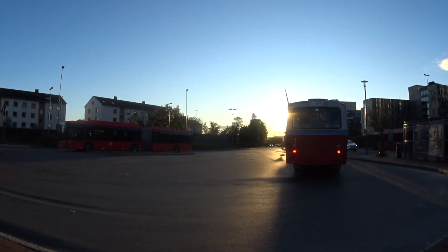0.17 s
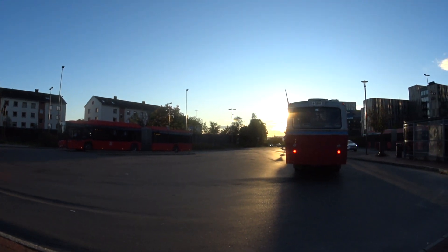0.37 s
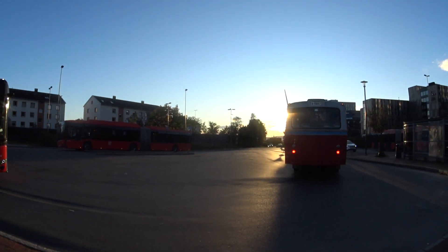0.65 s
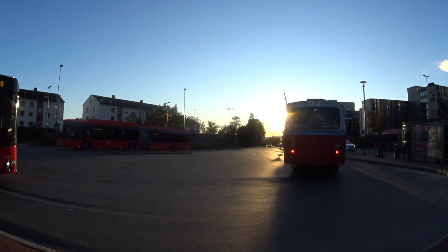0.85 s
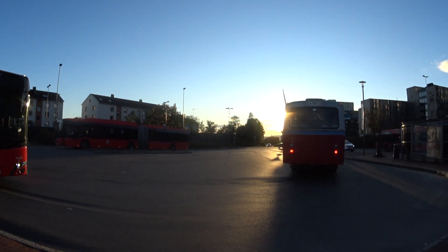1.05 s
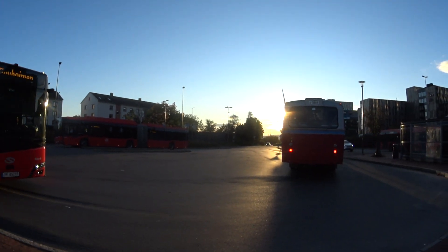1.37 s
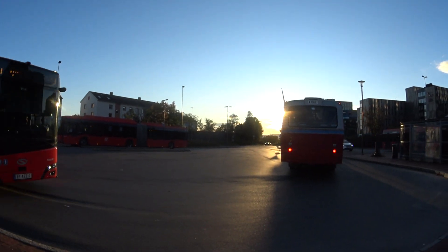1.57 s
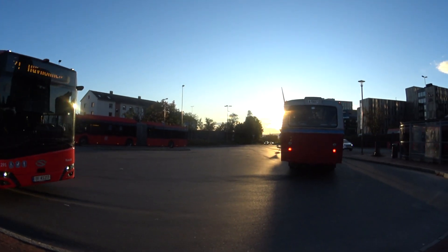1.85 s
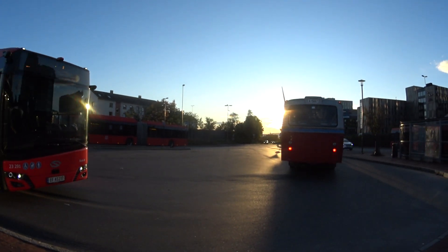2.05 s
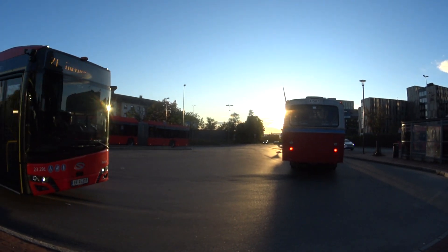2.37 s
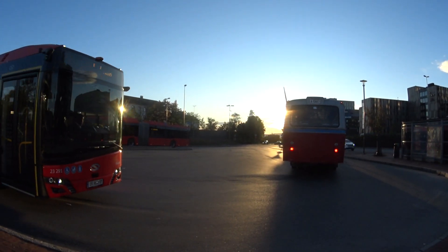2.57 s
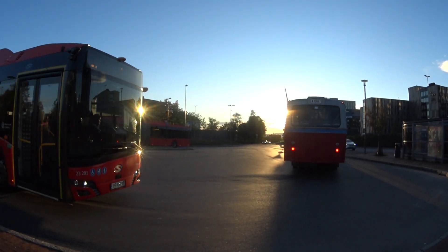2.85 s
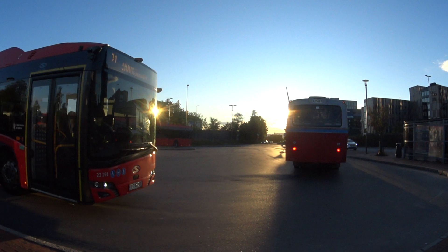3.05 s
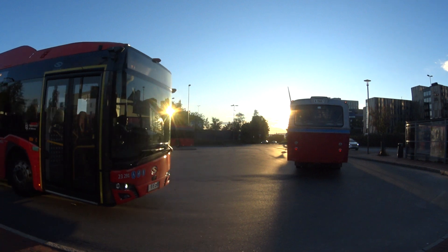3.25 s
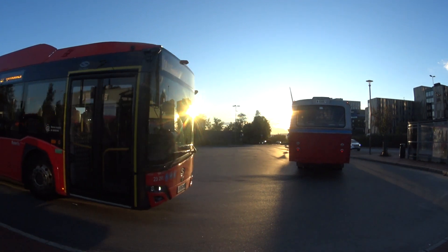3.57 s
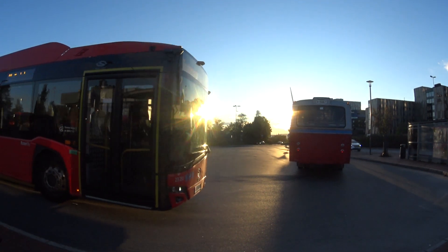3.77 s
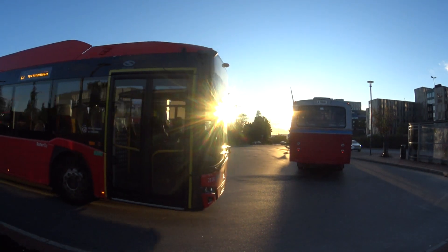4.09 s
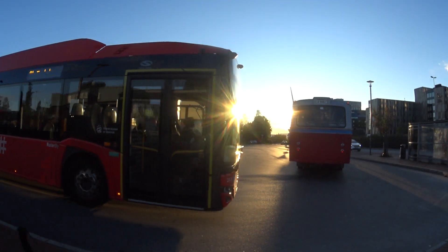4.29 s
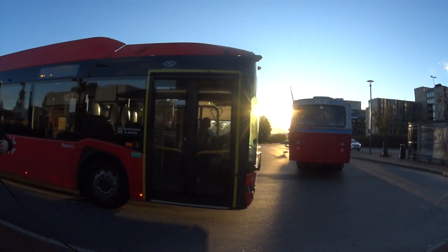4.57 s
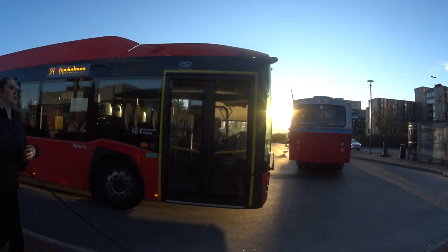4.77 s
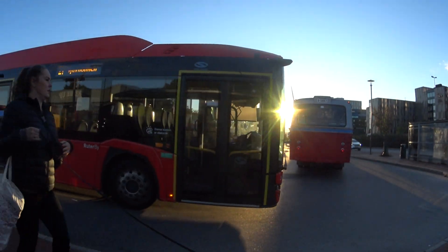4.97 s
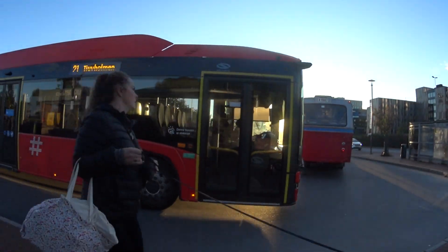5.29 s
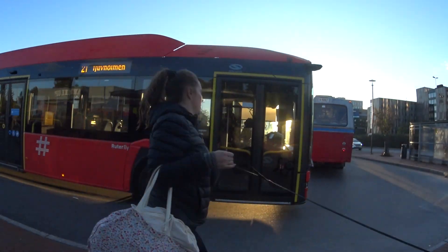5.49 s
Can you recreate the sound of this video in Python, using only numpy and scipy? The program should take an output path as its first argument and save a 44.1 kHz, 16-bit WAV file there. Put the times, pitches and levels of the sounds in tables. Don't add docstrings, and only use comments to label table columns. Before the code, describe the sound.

Outdoor bus terminal with a constant wash of engines and tyres and a faint fan whine. Half a second in, an air brake vents loudly, ending in a chirping puff and dull thud. A brief two-tone horn toot echoes off facades, with thin brake squeals around it. A lone air puff comes just past three seconds; later, faint brake singing and metal ticks. Small camera microphone, weak bass.

```python
import sys
import numpy as np
from scipy import signal
from scipy.fft import rfft, irfft, next_fast_len
from scipy.io import wavfile
from scipy.ndimage import uniform_filter1d, map_coordinates

SR = 44100
rng = np.random.default_rng(int(sys.argv[2]) if len(sys.argv) > 2 else 0)


def magnitude_from_level(level_db):
    exponent = np.asarray(level_db, float) / 20
    return 10 ** exponent


def int16_out(signal):
    q = np.round(np.clip(np.atleast_2d(signal).T, -1, 1) * 32767)
    wavfile.write(sys.argv[1], SR, q.astype(np.int16))


N = 248349

# frequency in Hz, level in dB per Hz.
JET_COLOUR = [(880, -34), (1500, -0.5), (2090, -2.5), (3040, 1), (3990, -3), (4300, 0.5), (4640, -2),
              (6790, -3), (10900, -12), (14200, -53), (22000, -120)]
# frequency in Hz, level in dB per Hz.
ROAR_COLOUR = [(71, -54), (120, -35), (166, -47), (226, -4.5), (264, -14), (300, -7.5), (608, -2.5),
               (955, -2.5), (1730, -11), (3500, -12.5), (4550, -34), (7700, -120)]
# opens in seconds, rise in seconds, shuts in seconds, peak in dB,
# fade in seconds for the first 10 dB.
JET_VENT = (0.552, .057, 1.11, -16.5, .045)
ROAR_VENT = (0.585, .036, 1.07, -20.5, .075)
# opens in seconds, rise in seconds, shuts in seconds, peak in dB,
# fade in seconds for the first 10 dB.
PUFFS = [
    (0.988, .016, 1.11, -20, .05),
    (3.131, .014, 3.21, -21.8, .15),
]
# frequency in Hz, level in dB per Hz.
PUFF_COLOUR = [(290, -30), (500, -9), (893, -22), (1080, -15), (1230, -8), (1350, -11.5), (1770, -5.5),
               (3000, 1.5), (3890, -4), (7700, -1.5), (10900, -9.5), (14200, -54), (22000, -120)]
# frequency in Hz, width in Hz, level in dB.
PIPE_RESONANCES = [(1375, 45, 13), (2980, 700, -0.5), (4100, 110, 3), (7350, 200, -8)]
# start in seconds, length in seconds, pitch in Hz,
# glide in Hz, level in dB.
EDGE_TONES = [
    (1.0, .06, 2900, 250, -33),
    (1.055, .042, 3030, -230, -22.5),
    (3.133, .05, 3000, 550, -31),
    (5.07, .1, 2900, 0, -53),
]
# time in seconds, peak in dB, pitch in Hz, time to fall 60 dB in seconds.
THUDS = [
    (1.037, -32.5, 126, 0.062),
]
# frequency in Hz, likeness (0 to 1).
AIR_ALIKE = [(60, 0.66), (300, 0.99), (1000, 0.75), (4000, 0.93), (11000, 1)]
HORN_HZ = 416.5, 515.9
LOW_HORN_DB = [-37, -30.5, -27, -34.5, -40, -26, -25, -33, -37, -39, -42, -43, -42, -51, -49, -55, -41, -52,
               -46, -51, -49, -51, -52]
HIGH_HORN_DB = [-29, -34.5, -18.5, -22.5, -27, -28, -35, -44, -52, -58, -61, -64, -59, -59, -60, -63, -55,
                -66]
# frequency in Hz, width in Hz, boost in dB.
FLARE = (992, 50, 6)
RELAY_S = 1.284, 1.472
# start in seconds, length in seconds, pitch in Hz, glide in Hz, level in dB.
SQUEALS = [(.45, .15, 8863, 0, -60), (1.24, .3, 10060, -70, -57), (1.5, .28, 9975, 170, -57),
           (1.76, .36, 10140, -70, -56), (2.1, .19, 10070, -170, -54), (1.56, .3, 8975, -50, -60),
           (1.86, .56, 8940, -70, -61), (1.75, .28, 9790, -35, -66), (1.58, .22, 4018, 4, -51),
           (1.81, .25, 4022, 4, -57), (2.04, .24, 4035, -45, -52), (2.28, .08, 3845, -35, -50),
           (2.06, .18, 5322, -8, -62), (2.205, .095, 5315, -14, -49), (3.71, .27, 8850, 40, -56),
           (3.97, .36, 8888, 12, -56), (4.72, .33, 5275, 0, -48), (5.04, .23, 5275, 0, -54),
           (4.83, .53, 6985, 0, -56), (5.26, .5, 5275, 0, -44), (4.76, .16, 9135, 0, -65),
           (5.4, .26, 9145, 0, -61), (.3, .3, 2140, 0, -53), (4.2, .72, 2620, 0, -55)]
# time in seconds, level in dB.
FAN_LEVEL = [(0, -43), (.2, -37), (.46, -43.5), (.6, -44), (1.8, -48), (2.3, -47), (2.7, -76), (3.3, -48),
             (3.6, -57), (4.1, -43), (4.5, -49.5), (4.85, -48.5), (5.05, -51), (5.4, -53), (5.63, -48)]
# time in seconds, peak in dB, ring in Hz.
TICKS = [
    (1.878, -55, 8400),
    (1.93, -55, 8300),
    (4.80, -48, 10650),
    (5.017, -36, 4300),
    (5.022, -52, 10600),
    (5.169, -39, 3600),
    (5.59, -49, 7600),
]
# delay in seconds, level in dB.
FACADES = [(.05, -16), (.098, -19.5), (.135, -34.5), (0.206, -27.5)]
# frequency in Hz, time to fall 60 dB in seconds.
SQUARE_FADE = [(300, 0.66), (1000, 0.35), (3000, 0.4), (10000, 0.27)]
# time in seconds, engine level in dB.
TRAFFIC = [(0, -37), (.45, -35.5), (1.75, -39), (2.1, -40), (2.6, -37.5), (3.1, -37), (4.0, -36.5),
           (4.33, -35.5), (4.8, -37.5), (5.63, -37.5)]
# frequency in Hz, level in dB per Hz.
ENGINE_COLOUR = [(15, -73), (25, -25), (113, -18), (154, -17), (287, -8), (383, -13), (434, -7), (616, -5),
                 (1080, -2.5), (1190, -4.5), (1530, -9), (2570, -22), (3500, -32.5), (4550, -90),
                 (7700, -120)]
# frequency in Hz, level in dB per Hz.
TYRE_COLOUR = [(1060, -28), (1800, -2.5), (2360, -1.5), (2560, -2.5), (2770, -3.5), (3940, -12.5),
               (5210, -12.5), (5790, -13), (6290, -13.5), (7150, -17), (10900, -33), (14200, -59),
               (22000, -120)]
# frequency in Hz, width in Hz, level in dB, loudest at in seconds,
# spread in seconds.
DRONES = [
    (293.3, 33, -52, 3.03, 0.7),
    (2956, 62, -55.5, 3.8, 1),
    (6350, 160, -57, 3.4, 0.67),
    (6330, 530, -58.5, 4.75, .8),
    (6620, 360, -61, .2, .5),
]
# frequency in Hz, likeness (0 to 1).
STREET_ALIKE = [(60, 0.99), (300, 1), (1000, 0.77), (4000, 0.91), (11000, 0.71)]
# frequency in Hz, left minus right in dB.
STREET_LEAN = [(60, -0.5), (170, -0.5), (480, -1.0), (1370, -1.5), (3900, 3.5), (11100, 2.5)]
# frequency in Hz, lead of the left in radians.
PORT_LEAD = [(0, 0), (430, 0.63), (1460, 0.76), (5430, 0.41), (5860, 0.38), (7410, 0.42), (11200, 0.92)]

TANK_DB_PER_S, PUFF_DB_PER_S = 26, -8
FADE_CURVE = 1.6
CONTACT_S, CONTACT_DB = 0.0061, -15
SPIN_UP_S, FLAT_START = 0.009, 0.055
SAG_PER_S, RING_OUT_S = 1.8, 0.031
TILT_DB, DULL_DB = -1.5, 140
FREE_RING_DB, FREE_RING_S = 7, 0.012
FAN_HZ, FAN_SLOWS_HZ_PER_S = 1240.5, 3.3
TYRES_DB, TYRES_FOLLOW = -46, 0.58
TOP_HZ = 11050


def unit(x):
    return x / np.sqrt(np.mean(x ** 2) + 1e-20)


def along(points, hz):
    f, values = np.transpose(points)
    return np.interp(np.log(hz + 1), np.log(f + 1), values)


def curve(rows):
    s, values = np.transpose(rows)
    return np.interp(np.arange(N) / SR, s, values)


def wobble(rate):
    knots = rng.standard_normal(int(N * rate / SR) + 4)
    return map_coordinates(knots, [np.arange(N) * rate / SR], order=2)


def filtered(x, response):
    m = next_fast_len(N + 8192)
    spectrum = rfft(x, m) * response(np.fft.rfftfreq(m, 1 / SR))
    return irfft(spectrum, m)[..., :N]


def pan(db):
    return magnitude_from_level(np.array([[db / 2], [-db / 2]]))


def rush(gain, alike, patchy_db):
    z = signal.stft(rng.standard_normal((2, N)), nperseg=512)[2]
    patches = uniform_filter1d(rng.standard_normal(z.shape[1:]), 4, 0)
    patches = unit(uniform_filter1d(patches, 10, 1))
    pair = signal.istft(z * magnitude_from_level(patchy_db * patches), nperseg=512)[1][:, :N]

    def middle_and_side(hz):
        angle = np.arccos(np.clip(along(alike, hz), -1, 1)) / 2
        return gain(hz) * [np.cos(angle), np.sin(angle)]

    mid, side = filtered(pair, middle_and_side)
    return unit(np.array([mid + side, mid - side]))


def whistle(start, length, hz, glide_hz, db, blur_hz, beads, edge=0.37):
    t = np.arange(round(length * SR)) / SR
    knots = rng.standard_normal((3, 2000))
    blur, beat, fuzz = (map_coordinates(k, [t * rate], order=2) for k, rate in zip(knots, (45, 45, 330)))
    pitch = hz + glide_hz * t / length + blur_hz * blur
    phase = 2 * np.pi * np.cumsum(pitch) / SR
    swell = np.abs(np.sin(np.pi * t / length)) ** edge
    out = np.zeros(2 * N)
    out[round(start * SR):][:len(t)] = magnitude_from_level(db + 4) * swell * (1 + beads * beat + 0.19 * fuzz) * np.sin(phase)
    return out[:N]


def vent(opens, rise, shuts, peak_db, fade, loss_db):
    t = np.arange(N) / SR
    opening = 1 - np.exp(-(np.clip(t - opens, 0, None) / rise) ** 2)
    held = np.clip(t - opens - rise, 0, shuts - opens)
    fade_db = 10 * (np.clip(t - shuts, 0, None) / fade) ** FADE_CURVE
    return peak_db + 20 * np.log10(opening + 1e-6) - loss_db * held - fade_db


def pipe(hz):
    return 1 + sum(magnitude_from_level(db) / np.abs(1 + 2j * (hz - centre) / width) for centre, width, db in PIPE_RESONANCES)


def air_blast(flutter):
    jet_db = vent(*JET_VENT, loss_db=TANK_DB_PER_S)
    roar_db = vent(*ROAR_VENT, loss_db=TANK_DB_PER_S)
    jet = rush(lambda hz: magnitude_from_level(along(JET_COLOUR, hz)), AIR_ALIKE, patchy_db=-2.0)
    roar = rush(lambda hz: magnitude_from_level(along(ROAR_COLOUR, hz)) * pipe(hz), AIR_ALIKE, patchy_db=0.5)
    return magnitude_from_level(jet_db) * jet * flutter + magnitude_from_level(roar_db) * roar


def valve_puffs(flutter):
    flow = sum(magnitude_from_level(vent(*p, loss_db=PUFF_DB_PER_S)) for p in PUFFS)
    puff = rush(lambda hz: magnitude_from_level(along(PUFF_COLOUR, hz)) * pipe(hz), AIR_ALIKE, patchy_db=-1.0)
    treble = filtered(puff, lambda f: 1 / (1 + (5500 / (f + 1)) ** 4))
    weak = np.clip((-23 - 20 * np.log10(flow + 1e-9)) / 16, 0, 1)
    puff = puff - 0.56 * weak * treble
    edge_tones = sum(whistle(*e, blur_hz=60.5, beads=0.13) for e in EDGE_TONES)
    return flow * puff * flutter + edge_tones


def air():
    flutter = magnitude_from_level(0.35 * wobble(980))
    return air_blast(flutter) * pan(-1.3) + valve_puffs(flutter) * pan(-0.7)


def horn():
    on_s, off_s = RELAY_S
    on = slice(round(on_s * SR), round((off_s + 0.1) * SR))
    t = np.arange(on.stop - on.start) / SR
    after = np.clip(t - (off_s - on_s), 0, None)
    share = 1 - FLAT_START * np.exp(-(t / (2 * SPIN_UP_S)) ** 2) - SAG_PER_S * after
    tilt_db = TILT_DB - DULL_DB * SAG_PER_S * after
    free_ring_db = FREE_RING_DB * (1 - np.exp(-after / FREE_RING_S))
    closed = np.clip((t - CONTACT_S) / 0.0019, 0, 1)
    onset_db = 20 * np.log10(1e-3 + np.clip(t / 0.0013, 0, 1))
    db = CONTACT_DB * (1 - closed) + onset_db - 10 * (after / RING_OUT_S) ** 3.7
    flare_hz, flare_width, flare_boost = FLARE
    sound = np.zeros(len(t))
    for hz, levels in zip(HORN_HZ, (LOW_HORN_DB, HIGH_HORN_DB)):
        pitch = hz * share * (1 + 0.0019 * wobble(60.18)[on])
        phase = 2 * np.pi * np.cumsum(pitch) / SR
        for k, level in enumerate(levels, start=1):
            flare_db = flare_boost / (1 + (2 * (k * pitch - flare_hz) / flare_width) ** 2)
            colour_db = level + tilt_db * np.log2(max(k * hz, 800) / 1200) + flare_db
            if k == 2:
                colour_db = colour_db + free_ring_db
            waver_db = 2.6 * np.sin(2 * np.pi * rng.uniform(3.4, 24.3) * t + rng.uniform(0, 2 * np.pi))
            sound += magnitude_from_level(colour_db + 3.0 + waver_db) * np.sin(k * phase + rng.uniform(0, 2 * np.pi))
    rattle_colour = [(300, -37), (1500, -5), (5000, -6), (11000, -24)]  # Hz, dB
    rattle = filtered(rng.standard_normal(N), lambda f: magnitude_from_level(along(rattle_colour, f)))
    sound = magnitude_from_level(db) * (sound + magnitude_from_level(-35.5) * unit(rattle)[on])
    out = np.zeros(N)
    out[on] = 0.86 * np.tanh(sound / 0.82)
    return out


def square(x, wet_db):
    hz, t, z = signal.stft(rng.standard_normal((2, SR * 3 // 4)), SR, nperseg=256)
    fading = magnitude_from_level(-60 * t / along(SQUARE_FADE, hz)[:, None])
    tail = signal.istft(z * fading, SR, nperseg=256)[1]
    tail *= magnitude_from_level(wet_db) / np.linalg.norm(tail[0])
    tail[1] = 0.94 * tail[0] + 0.41 * tail[1]
    for s, db in FACADES:
        tail[:, round(s * SR)] += magnitude_from_level(db)
    wet = signal.fftconvolve(x[None], tail, axes=1)[:, :N]

    def facade_colour(f):
        peak = 1 + 2.2j * f * 120 / (1020 ** 2 - f * f + 1j * f * 120)
        return peak / (1 + 1j * f / 8000)

    return filtered(wet, facade_colour)


def brakes():
    return sum(whistle(*row, blur_hz=8.0, beads=0.38) for row in SQUEALS) * pan(5.7)


def fan():
    seconds = N / SR
    tone = whistle(0, seconds, FAN_HZ, -FAN_SLOWS_HZ_PER_S * seconds, 0, blur_hz=1.45, beads=0.11, edge=0.011)
    return tone * magnitude_from_level(curve(FAN_LEVEL) + 0.87 * wobble(9.7)) * pan(2.9)


def ticks():
    out = np.zeros(N + SR)
    t = np.arange(4000) / SR
    for s, db, hz in TICKS:
        click = 0.8 * magnitude_from_level(-60 * t / 0.006) * rng.standard_normal(len(t))
        ring = magnitude_from_level(-60 * t / 0.015) * np.sin(2 * np.pi * hz * t)
        out[round(s * SR):][:len(t)] += magnitude_from_level(db) * (ring + click)
    for s, db, hz, t60 in THUDS:
        thud = magnitude_from_level(db - 60 * t / t60) * np.sin(2 * np.pi * hz * t)
        out[round(s * SR):][:len(t)] += thud * (1 - np.exp(-t / 0.0033))
    return out[:N]


def street():
    engine_db = curve(TRAFFIC)
    tyre_db = TYRES_DB + TYRES_FOLLOW * (engine_db - engine_db.mean())
    engines = rush(lambda hz: magnitude_from_level(along(ENGINE_COLOUR, hz)), STREET_ALIKE, patchy_db=1.0)
    tyres = rush(lambda hz: magnitude_from_level(along(TYRE_COLOUR, hz)), STREET_ALIKE, patchy_db=1.5)
    wash = magnitude_from_level(engine_db + 0.8 * wobble(12)) * engines
    wash += magnitude_from_level(tyre_db + 0.9 * wobble(9)) * tyres
    t = np.arange(N) / SR
    for centre, width, db, loudest, spread in DRONES:
        hum = filtered(rng.standard_normal(N), lambda f: 1 / (1 + (2 * (f - centre) / width) ** 2))
        passing_db = -3.7 * ((t - loudest) / spread) ** 2
        wash += magnitude_from_level(db + 2.1 * wobble(3.84) + passing_db) * unit(hum)
    return filtered(wash, lambda f: magnitude_from_level(along(STREET_LEAN, f) * [[0.5], [-0.5]]))


def scene():
    jets = air()
    toot = horn()
    echoes = square(toot + magnitude_from_level(-2) * jets.mean(axis=0), wet_db=-4)
    return jets + toot * pan(5.5) + echoes + brakes() + fan() + ticks() + street()


def band_limit(x):
    return signal.sosfilt(signal.butter(12, 11660, fs=SR, output="sos"), x)


def record(dry):
    bent = dry - 0.018 * dry ** 2 - 0.027 * dry ** 3

    def microphone(f):
        ports = np.exp(1j * along(PORT_LEAD, f) * np.array([[0.5], [-0.5]]))
        top = np.sin(np.pi / 2 * np.clip((TOP_HZ + 60 - f) / 160, 0, 1)) ** 2
        weak_bass = 1j * f / (60 + 1j * f)
        return ports * top * weak_bass

    return band_limit(filtered(bent, microphone))


dry = scene()
out = record(dry)
int16_out(out)
```